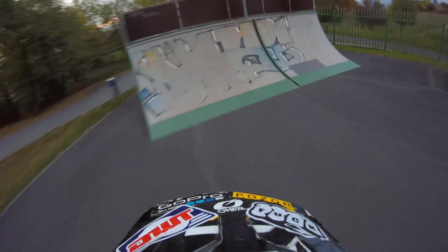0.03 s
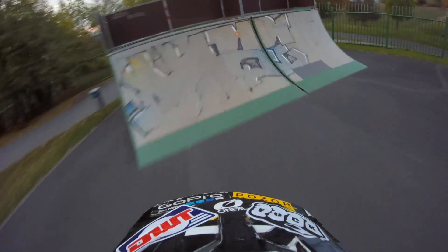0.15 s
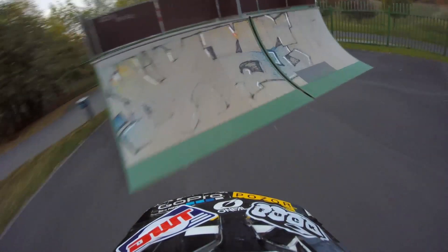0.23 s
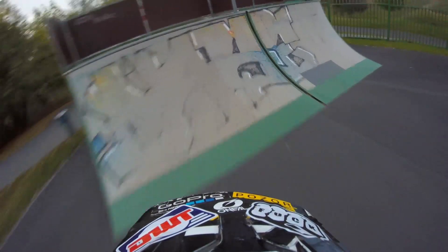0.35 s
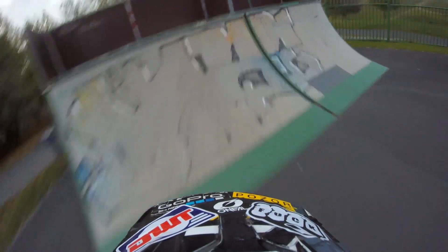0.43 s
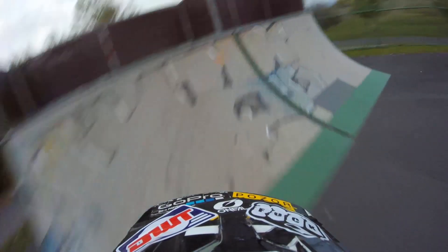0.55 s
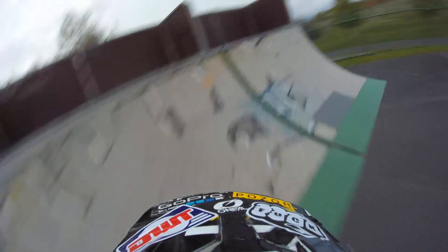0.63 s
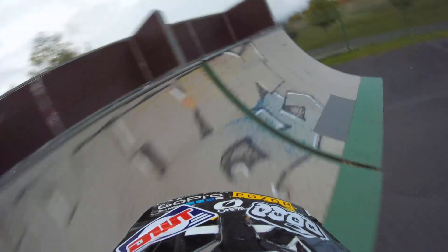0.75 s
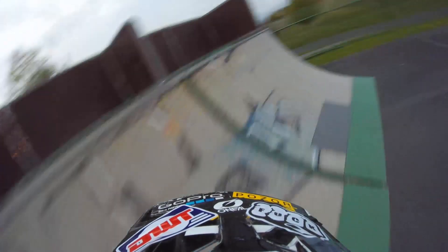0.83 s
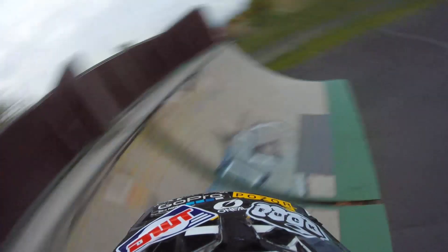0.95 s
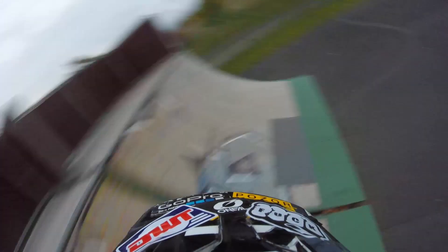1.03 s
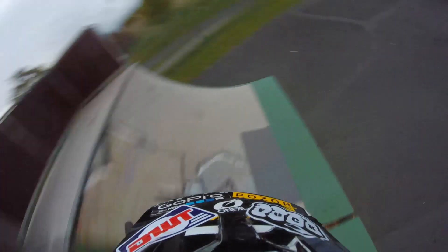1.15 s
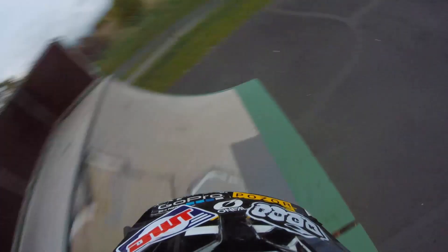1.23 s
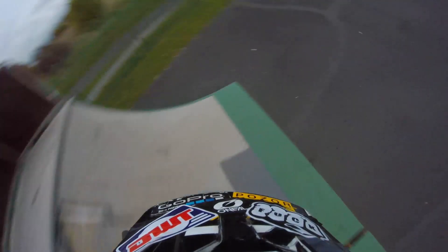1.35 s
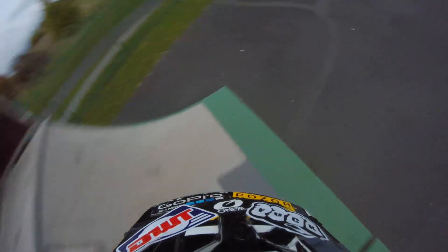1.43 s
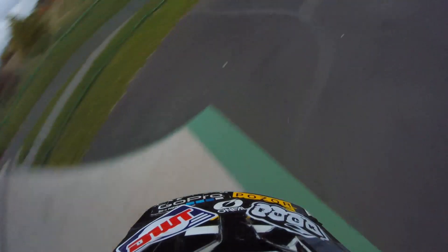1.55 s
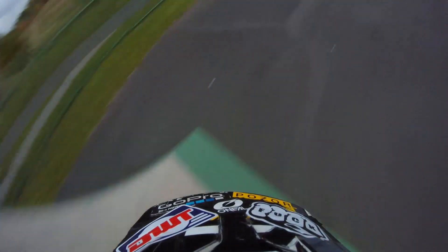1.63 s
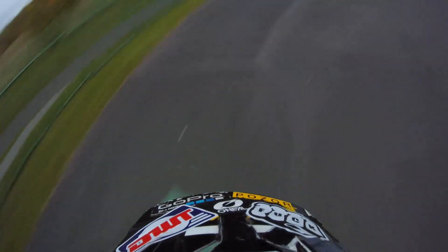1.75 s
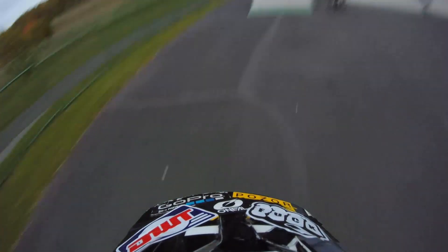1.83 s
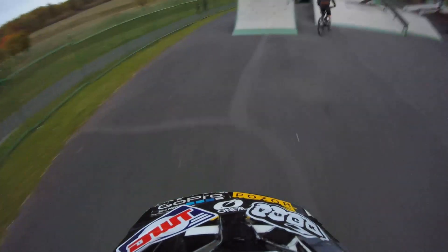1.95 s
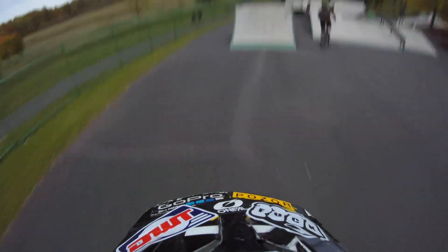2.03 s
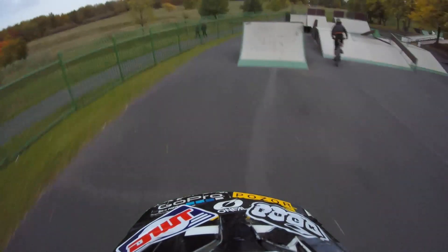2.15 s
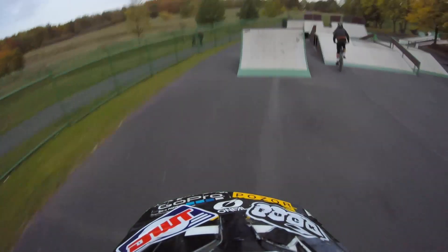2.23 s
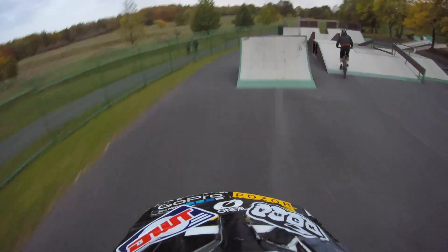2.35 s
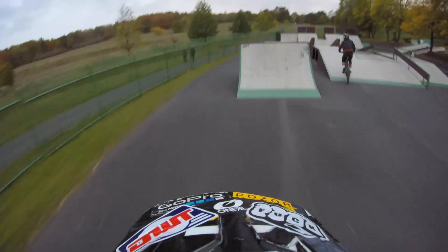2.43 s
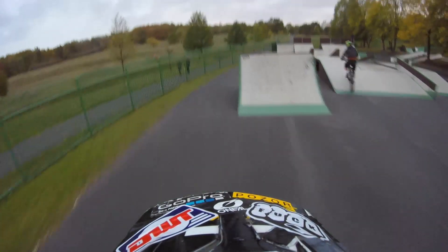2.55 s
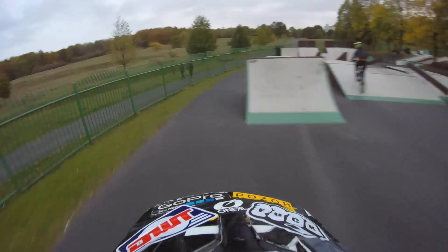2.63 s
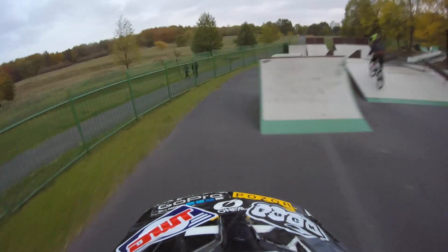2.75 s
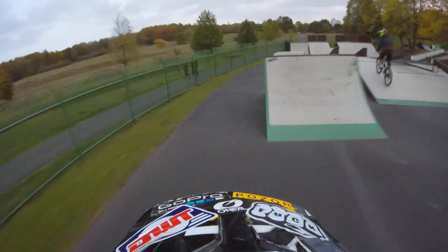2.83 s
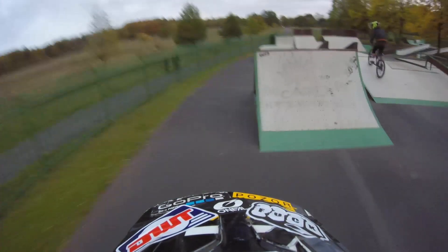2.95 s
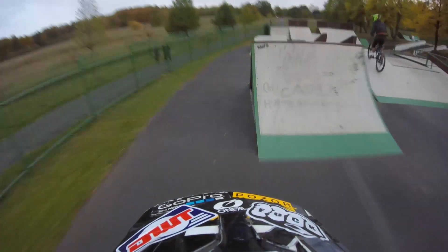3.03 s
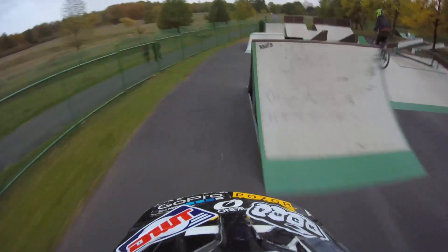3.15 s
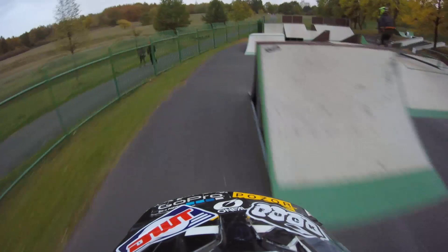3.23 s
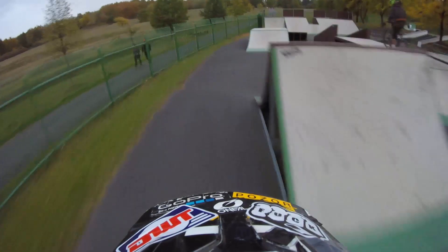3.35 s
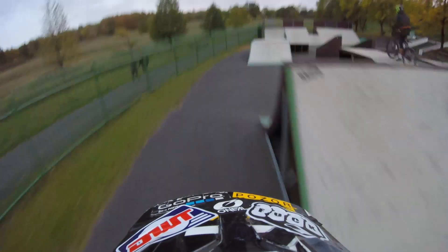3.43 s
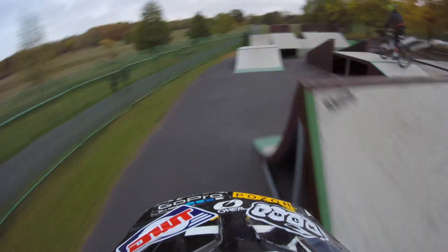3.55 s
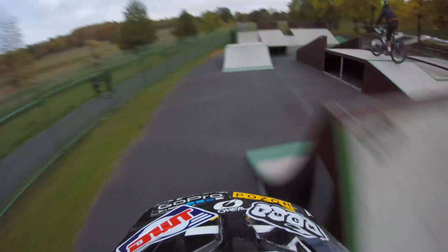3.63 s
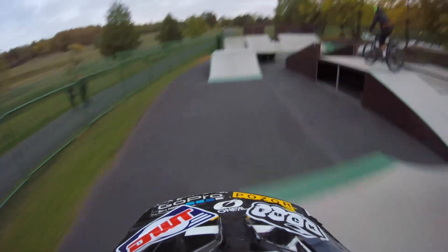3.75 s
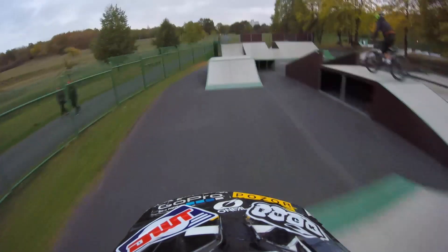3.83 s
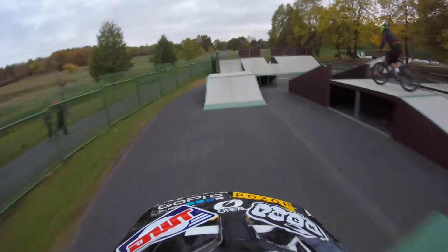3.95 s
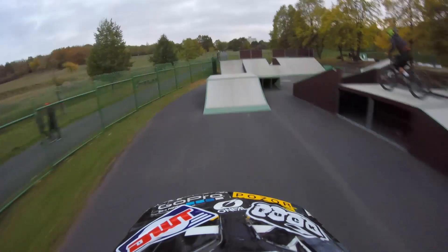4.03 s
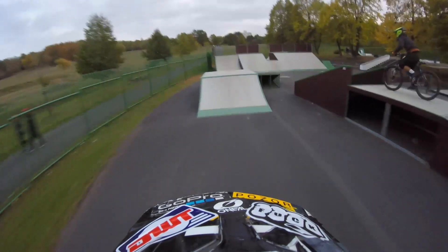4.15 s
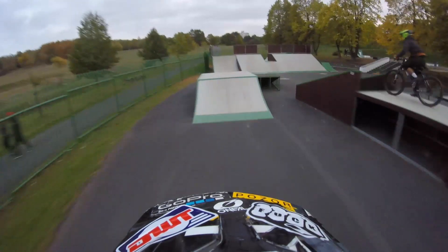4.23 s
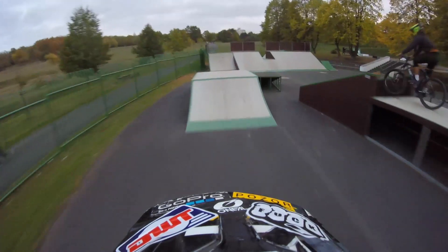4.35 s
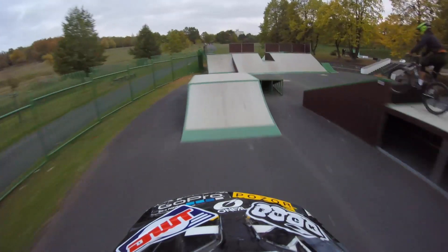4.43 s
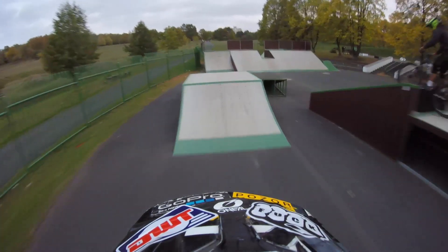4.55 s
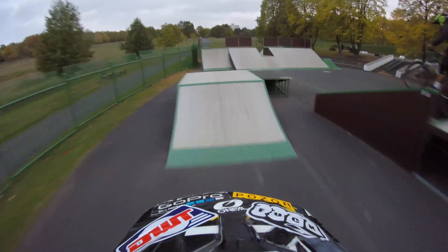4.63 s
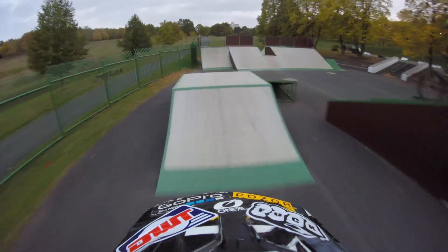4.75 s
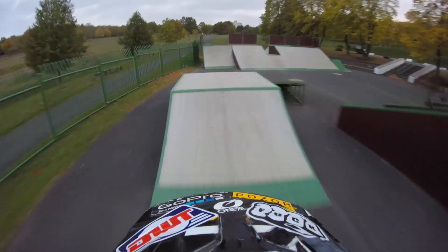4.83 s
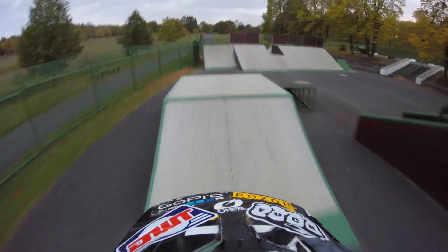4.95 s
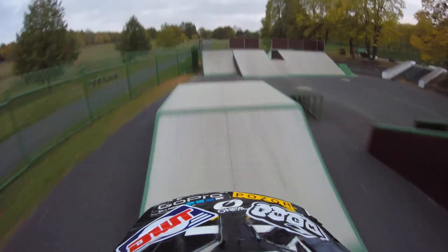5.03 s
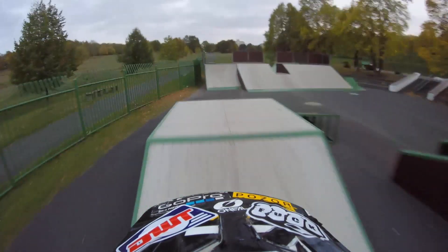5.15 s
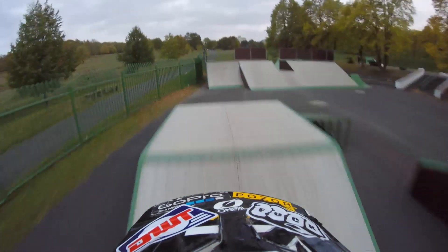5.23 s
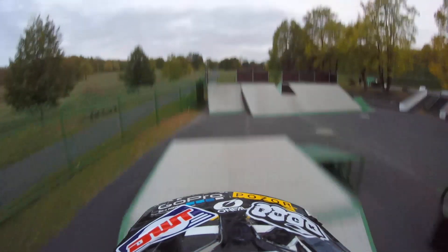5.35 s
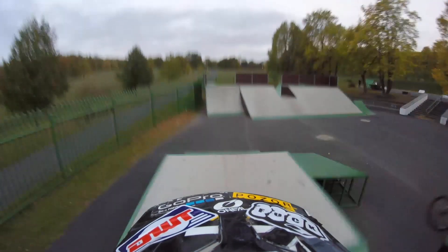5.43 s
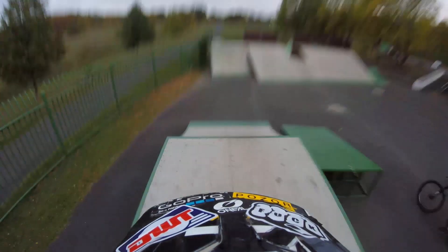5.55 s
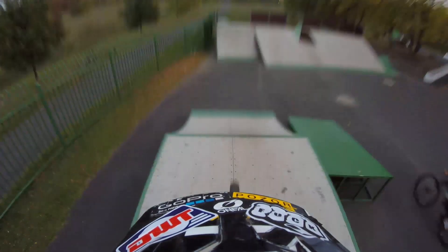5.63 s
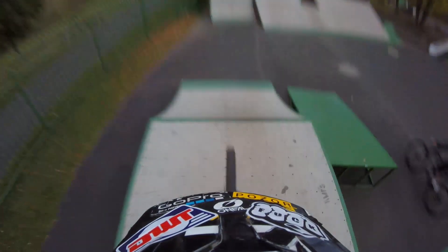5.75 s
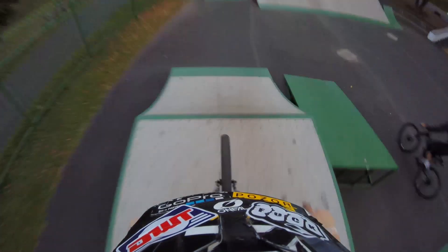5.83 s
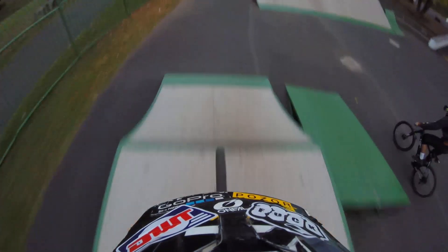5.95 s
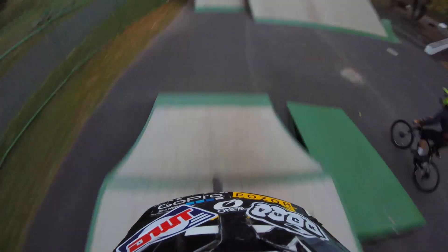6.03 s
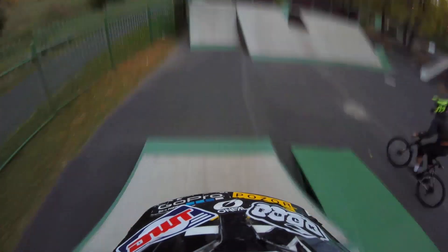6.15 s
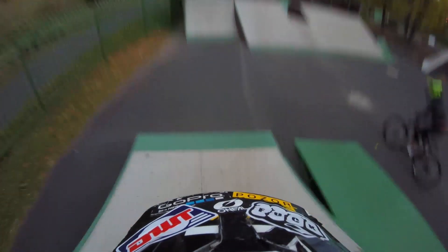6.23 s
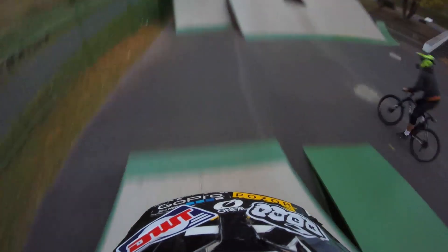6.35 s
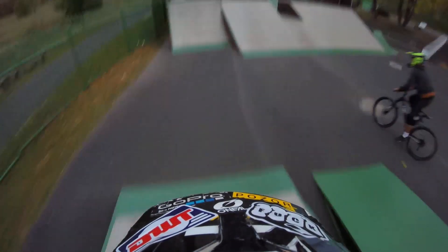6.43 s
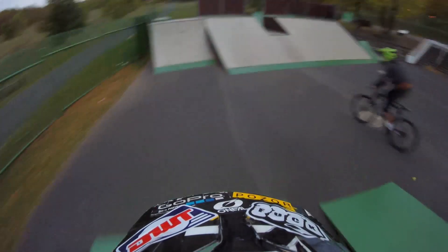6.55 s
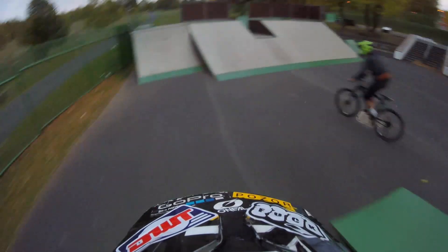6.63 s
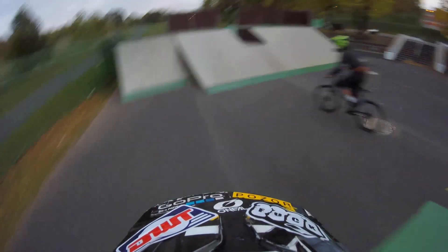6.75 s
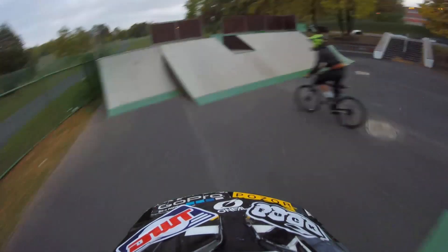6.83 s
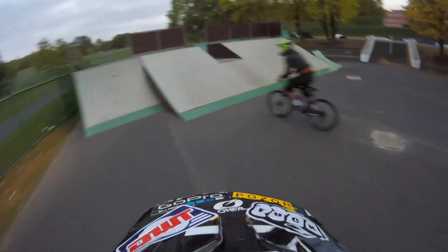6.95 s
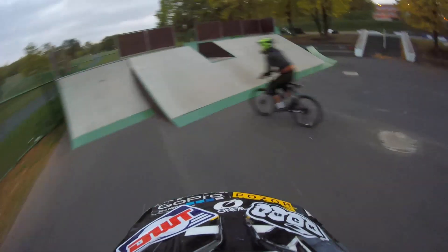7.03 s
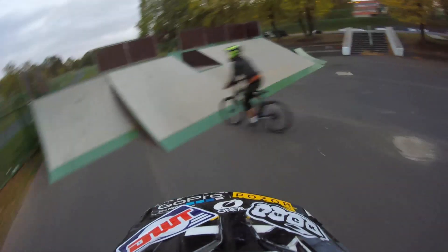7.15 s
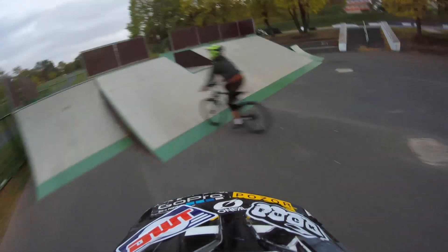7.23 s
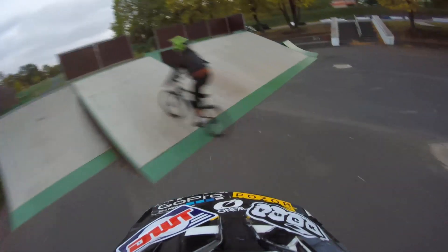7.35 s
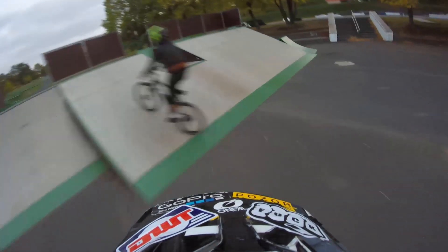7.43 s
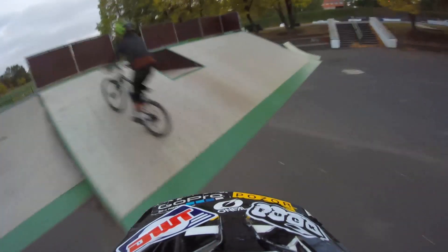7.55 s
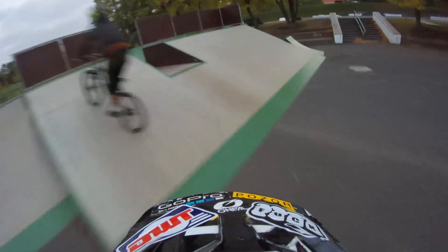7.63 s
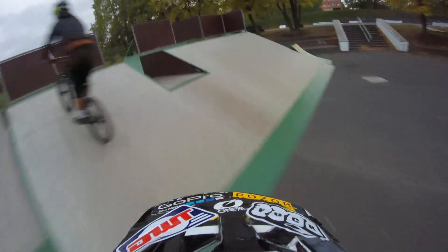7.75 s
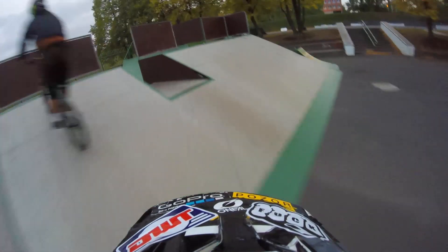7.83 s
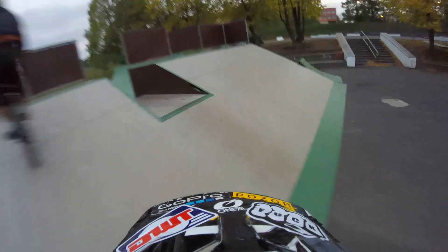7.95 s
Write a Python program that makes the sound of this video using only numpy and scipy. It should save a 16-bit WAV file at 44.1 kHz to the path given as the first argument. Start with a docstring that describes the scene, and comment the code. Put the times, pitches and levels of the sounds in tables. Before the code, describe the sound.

Outdoors in a skate park, a microphone sealed in a housing on a cyclist's helmet picks up a close, muffled ride. A soft, dull air rush runs throughout, with low fluttering and drumming underneath. At first the freewheel buzzes clearly over gritty tyre roll, fading by 0.6 s, when a knock and scraping tyres mark the first curved ramp. Small knocks follow around 1.2-1.9 s and 2.3-2.6 s. From about 2.8 to 4 s the hub buzz swells and dips over rolling tyres, then weakens. At 5.0-5.2 s a tight cluster of tyre slaps, chain and loose-part rattles hits a ramp with low thuds; another slap comes at 5.5 s. Wheel noise nearly vanishes until a hard crack and the heaviest bass thump at 6.1 s. A second deep thud lands at 6.7 s. Rapid clattering knocks at 7.3-7.5 s end in quiet rolling and faint buzz until 8 s.

```python
"""Low thumps and flutter, rolling tyres, a buzzing freewheel and sharp rattling knocks over a soft rush of air.
A camera in a closed housing on a cyclist's helmet crosses a skate park of asphalt and wooden ramps.
Buffeting and landings shake the housing: slow filtered noise, a narrow drumming band and damped swings.
Tyres, hub, chain and loose parts are random clicks sent through resonances; knocks are short noise bursts
through resonances or a plain band. The air rush is coloured noise that also rings a hollow of the helmet."""
import sys
import numpy as np
from scipy import signal
from scipy.fft import rfft, irfft
from scipy.io import wavfile
from scipy.ndimage import uniform_filter1d

SR = 44100
rng = np.random.default_rng(int(sys.argv[2]) if len(sys.argv) > 2 else 0)


def file_out(sig):
    """Save sig as 16-bit WAV at sys.argv[1]."""
    # one column per channel
    cols = np.atleast_2d(sig).T
    # limit, then scale
    lim = np.clip(cols, -1, 1)
    pcm = np.round(lim * 32767).astype(np.int16)
    wavfile.write(sys.argv[1], SR, pcm)


N = 352167

# resonances of the tyre: (frequency [Hz], width [Hz], level [dB])
TYRE_MODES = [(1458, 187, -5.5), (1860, 295, -7.5), (2245, 510, -12)]
# resonances of the chain: (frequency [Hz], width [Hz], level [dB])
CHAIN_MODES = [(3154, 335, 1.5), (3790, 450, -3), (4110, 200, -3.5)]
# resonances of the loose parts: (frequency [Hz], width [Hz], level [dB])
PARTS_MODES = [(4070, 450, 5), (4830, 63, -2), (5000, 440, -7.5), (6210, 380, 3.5), (7870, 660, -5.5),
               (10700, 3800, -13), (13400, 6000, -16.5)]


def undb(db):
    """Turn a level in dB into a gain."""
    return 10 ** (np.asarray(db) / 20)


def unit(x):
    """Scale a signal to an average (rms) strength of 1."""
    return x / np.sqrt(np.mean(x ** 2))


def columns(table):
    """Draw straight lines between the times of a table, giving each other column sample by sample."""
    times, *rest = np.transpose(table)
    return [np.interp(np.arange(N) / SR, times, column) for column in rest]


def ring(x, modes):
    """Resonances side by side, each boosting a narrow band; every second one is flipped in sign."""
    total = 0
    for k, (hz, width, db) in enumerate(modes):
        b, a = signal.iirpeak(hz, hz / width, fs=SR)
        total = total + (-1) ** k * undb(db) * signal.lfilter(b, a, x)
    return total


def band(x, lo_hz, hi_hz, order=2):
    """Keep the sound between two frequencies (Butterworth band-pass)."""
    return signal.sosfilt(signal.butter(order, [lo_hz, hi_hz], "band", fs=SR, output="sos"), x)


def walk(rate):
    """A random wander of rms 1: `rate` new values a second, smoothed twice."""
    hold = int(SR / rate)
    steps = np.repeat(rng.standard_normal(N // hold + 1), hold)
    smooth = uniform_filter1d(uniform_filter1d(steps, hold), hold)
    return unit(smooth[:N])


def grains(rate, scatter_db):
    """Random clicks of both signs, `rate` a second on average; a few are much louder than the rest."""
    hit = rng.random(N) < rate / SR
    return unit(hit * rng.standard_normal(N) * undb(scatter_db * rng.exponential(size=N)))


def swells(start, length, db, share):
    """Gain of sounds that rise, hold and fall; where they overlap, their powers add."""
    t, power = np.arange(N) / SR, np.zeros(N)
    for s, span, gain in zip(start, length, undb(db)):
        i, j = int(s * SR), min(int((s + span) * SR), N)
        to_nearest_end = np.minimum(t[i:j] - s, s + span - t[i:j])
        edge = np.clip(to_nearest_end / (share * span), 0, 1)
        power[i:j] += (gain * np.sin(np.pi / 2 * edge)) ** 2
    return np.sqrt(power)


def shaking():
    """Slow pressure eddies push the housing; its mount drums in a narrow band."""
    # gusts that buffet the housing: (start [s], length [s], level [dB])
    gusts = [(0, 0.73, -50.5), (0.536, 0.45, -36), (1.283, 0.13, -41.5), (1.56, 0.24, -46),
             (1.866, 0.7, -39.5), (2.556, 0.45, -45.5), (3.047, 0.41, -39.5), (3.748, 0.4, -41),
             (4.2, 0.15, -56), (4.853, 0.43, -46), (5.04, 0.47, -41), (5.715, 0.13, -40),
             (6.042, 0.15, -26), (6.188, 0.51, -39.5), (6.654, 0.25, -35.5), (7.297, 1, -41.5)]
    # spells of the mount drumming: (start [s], length [s], level [dB])
    spells = [(0.004, 0.46, -44), (0.504, 0.13, -43), (0.76, 0.49, -53), (1.1, 0.12, -41),
              (1.285, 0.49, -41), (1.933, 0.15, -43), (2.092, 0.14, -35), (2.285, 0.13, -40.5),
              (2.567, 0.3, -41), (2.89, 0.28, -43.5), (3.35, 0.31, -47), (3.703, 0.5, -53.5),
              (4.193, 0.24, -47.5), (4.56, 0.35, -57), (5.05, 0.28, -52.5), (5.405, 0.4, -48.5),
              (6.253, 0.31, -58), (6.677, 0.1, -34.5), (7.017, 0.19, -39.5), (7.226, 0.27, -45),
              (7.664, 0.25, -44.5)]
    # resonances of the mount: (frequency [Hz], width [Hz], level [dB])
    mount = [(87.1, 10.5, 10.5), (73.3, 4.7, -7)]
    buffet_db, drum_db = -48, -55  # steady levels between gusts and spells
    swell_share = 0.23  # part of a gust or spell spent rising, and again falling

    buffet = band(rng.standard_normal(N), 6.1, 24.4, order=1) * undb(1.0 * walk(3.18))
    drum = ring(rng.standard_normal(N), mount) * undb(0.5 * walk(5.4))
    buffet_gain = np.hypot(undb(buffet_db), swells(*np.transpose(gusts), swell_share))
    drum_gain = np.hypot(undb(drum_db), swells(*np.transpose(spells), swell_share))
    return buffet_gain * unit(buffet) + drum_gain * unit(drum)


def jolts():
    """Each landing pushes the housing for a moment; it swings one way, back and settles."""
    # jolts of the housing: (time [s], peak level [dB], swing [Hz], build-up [s], direction [+1 or -1])
    jolt_list = [(0.759, -27, 18, 0.026, 1), (2.055, -41, 10, 0.0072, -1), (2.235, -32, 24, 0.01, -1),
                 (5.12, -27.5, 22, 0.0056, -1), (5.262, -27, 7.8, 0.0087, 1), (5.499, -30.5, 22, 0.0075, 1),
                 (6.044, -25.5, 47, 0.0068, 1), (6.091, -10, 38.5, 0.0084, 1),
                 (6.124, -13.5, 30, 0.0043, 1), (6.179, -12, 27, 0.011, -1), (6.672, -23.5, 19, 0.0049, 1),
                 (6.7, -13, 36.5, 0.012, 1), (6.732, -11.5, 25, 0.0073, 1), (7.919, -27.5, 17, 0.019, -1)]
    out = np.zeros(N + SR)
    t = np.arange(SR // 2) / SR
    for s, db, hz, build, way in jolt_list:
        swing = np.sin(2 * np.pi * hz * t) * t * np.exp(-t / max(build, .002))
        out[int(s * SR):][:len(t)] += np.sign(way) * undb(db) * swing / np.abs(swing).max()
    return out[:N]


def knocks():
    """A snap, a burst that dies away and a weak scuff set off tyre, rim, chain, loose parts and plywood."""
    # knocks on ramp edges, with how hard each thing is struck before its own boost below:
    # (time [s], tyre slap [dB], rim crack [dB], chain [dB], loose parts [dB], plywood [dB],
    # time for the burst to fall by 60 dB [s])
    knock_list = [(0.5933, -50, -39, -52, -69, -50.5, 0.035), (1.1797, -65, -72, -78, -80, -46.5, 0.17),
                  (1.3686, -45, -73, -72, -76, -53, 0.069), (1.8337, -45, -50, -70, -74, -70, 0.074),
                  (1.8925, -47, -50, -68, -68, -64, 0.24), (2.2636, -58, -43, -62, -73, -69, 0.08),
                  (2.6474, -60, -47, -53, -53, -55, 0.058), (5.028, -56, -59, -63, -60, -67, 0.08),
                  (5.0521, -54, -56, -55, -53, -55, 0.08), (5.089, -42, -52, -51, -53, -53, 0.07),
                  (5.1217, -38.5, -56, -45, -47.5, -48.5, 0.11), (5.1454, -37, -51.5, -47, -45, -53, 0.089),
                  (5.5322, -35.5, -41, -55, -62, -62, 0.027), (5.789, -50, -53, -68, -71, -66, 0.09),
                  (6.0135, -44, -50, -55, -63, -49, 0.19), (6.0676, -34, -26, -42, -47, -42.5, 0.057),
                  (6.082, -48, -38, -54, -63, -52, 0.075), (6.348, -51, -44, -53, -66, -68, 0.13),
                  (6.7136, -31, -66, -72, -57, -46, 0.041), (7.293, -46, -53, -41, -43, -53, 0.038),
                  (7.3858, -36, -46, -52.5, -60, -47.5, 0.097), (7.4274, -64, -61, -49, -49, -67, 0.07),
                  (7.438, -40, -55, -50, -49, -51, 0.088), (7.4534, -41, -59, -52, -40.5, -56, 0.045),
                  (7.47, -50, -60, -47, -66, -60, 0.052)]
    # rise time of the burst in tyre, rim, chain, loose parts, plywood: (one value each [s])
    rise_s = [0.00033, 0.0005, 0.0015, 0.0016, 0.0011]
    # first snap over the burst, same five things: (one value each [dB])
    snap_db = [13.3, 12.3, 17, 3, 10.8]
    # resonance of the rim: (frequency [Hz], width [Hz], level [dB])
    rim_modes = [(2430, 280, -0.5)]

    tracks = np.zeros((5, N + SR))
    t = np.arange(SR // 3) / SR
    rise = 1 - np.exp(-t / np.array(rise_s)[:, None])
    snap = np.outer(undb(snap_db), np.exp(-t / 0.00012))
    scuff = 0.18 * np.exp(-t / 0.058)
    for s, *blow_db, t60 in knock_list:
        decay = np.exp(-np.log(1000) * t / max(t60, .01))
        burst = rng.standard_normal(len(t)) * (decay + scuff)
        tracks[:, int(s * SR):][:, :len(t)] += undb(blow_db)[:, None] * (burst * rise + snap)
    tyre, rim, chain, parts, plywood = tracks[:, :N]

    wheel = undb(11.0) * ring(tyre, TYRE_MODES)
    wheel += undb(4.5) * ring(rim, rim_modes)
    wheel += undb(8.5) * ring(chain, CHAIN_MODES)
    loose = undb(7.5) * band(ring(parts, PARTS_MODES), 2900, 17000)
    boards = undb(18.5) * band(plywood, 94, 286)
    return band(wheel, 1160, 4560, order=3) + loose + boards


def bike():
    """Tread on grit, pawls chattering in the hub, chain and guards rattling; little bass passes the shell."""
    # the ride: (time [s], tyre roll level [dB], freewheel buzz level [dB])
    ride = [(0, -52.5, -46.5), (0.35, -56.5, -51.5), (0.66, -59.5, -59.5), (0.8, -58, -56.5),
            (0.96, -59.5, -60.5), (1.12, -63.5, -75), (1.55, -62.5, -74), (1.8, -63, -68),
            (2.14, -53.5, -78), (2.21, -56, -57), (2.86, -54, -46.5), (3.1, -53, -53), (3.25, -52.5, -50.5),
            (3.68, -58, -58), (3.77, -53.5, -51.5), (3.9, -55.5, -49), (4.1, -58.5, -56),
            (4.65, -59, -57.5), (5.0, -63, -60.5), (5.5, -59, -63), (5.6, -69, -76), (5.98, -78, -76),
            (6.55, -65, -68), (6.64, -60, -63), (7.2, -61, -59), (7.55, -61, -64), (7.98, -61, -60)]
    # resonances of the hub: (frequency [Hz], width [Hz], level [dB])
    hub = [(2206, 385, -9), (2586, 123, 1), (3145, 82, -12.5), (6340, 300, -25.5), (9200, 100, -34),
           (10420, 380, -35.5), (13000, 200, -39), (13800, 720, -37)]
    # scrapes of the wheels over ramp edges and decks:
    # (start [s], length [s], tyre level [dB], chain level [dB], loose parts level [dB])
    scrapes = [(0.64, 0.07, -59, -75, -81), (0.724, 0.17, -57, -68, -73), (0.9, 0.09, -63, -70, -74),
               (1.17, 0.1, -60, -85, -75), (1.328, 0.071, -64, -84, -80), (5.05, 0.072, -55, -61.5, -64),
               (5.108, 0.092, -49, -57.5, -53.5), (5.163, 0.14, -54, -62, -67),
               (5.314, 0.12, -59, -61, -72), (5.47, 0.061, -51.5, -66, -70), (5.594, 0.2, -66, -77, -82),
               (6.07, 0.16, -57.5, -68, -73), (6.223, 0.1, -57, -70, -75), (6.342, 0.087, -60, -67, -68),
               (7.233, 0.068, -58, -65, -69), (7.286, 0.1, -53, -60.5, -64),
               (7.384, 0.049, -52.5, -60, -69), (7.417, 0.082, -51, -58, -70), (7.484, 0.07, -57, -63, -68),
               (7.824, 0.15, -72, -68, -73)]
    scrape_share = 0.24  # part of a scrape spent rising, and again falling
    chain_below_buzz_db, parts_below_buzz_db = -8, -27.5
    chain_idle_db, parts_idle_db = -77.5, -77.5  # rustle and rattle that never stop

    roll = band(ring(grains(3000, 0.63) * undb(0.56 * walk(17)), TYRE_MODES), 865, 3700, order=3)
    buzz = band(ring(grains(1500, 0.52) * undb(1.3 * walk(11)), hub), 1500, 17000)
    rustle = band(ring(grains(2500, 0.56) * undb(0.69 * walk(16)), CHAIN_MODES), 2620, 3840, order=3)
    rattle = band(ring(grains(2500, 2.9) * undb(3.6 * walk(25)), PARTS_MODES), 3300, 17000)

    rolling, coasting = undb(columns(ride))
    start, length, *scrape_db = np.transpose(scrapes)
    scuff, shake, clatter = (swells(start, length, db, scrape_share) for db in scrape_db)
    # gains add as powers: idle, share of the buzz, scrapes
    tyre_gain = np.hypot(rolling, scuff)
    chain_gain = np.sqrt(undb(chain_idle_db) ** 2 + (undb(chain_below_buzz_db) * coasting) ** 2 + shake ** 2)
    parts_gain = np.sqrt(undb(parts_idle_db) ** 2 + (undb(parts_below_buzz_db) * coasting) ** 2 + clatter ** 2)
    wheels = tyre_gain * unit(roll) + coasting * unit(buzz)
    return wheels + chain_gain * unit(rustle) + parts_gain * unit(rattle)


def rush():
    """Smooth air noise leaks through the shell, and a hollow of the helmet rings with it."""
    # tone colour of the rushing air: (frequency [Hz], level per Hz [dB])
    rush_colour = [(65, -56), (110, -12), (144, -6.5), (173, -8), (947, -19), (1210, -21), (1530, -17.5),
                   (1690, -18.5), (2560, -25), (4380, -31.5), (6360, -34.5), (10700, -40), (14600, -48.5),
                   (15500, -52)]
    # hollow that the air noise rings: (frequency [Hz], width [Hz], level [dB])
    hollow = [(316, 57, -8.5)]
    # air rushing past, before a slight random wander: (time [s], level [dB])
    air_level = [(0, -53.5), (0.6, -56), (1.6, -56.5), (2.5, -55), (3.3, -54.5), (4.4, -57), (5.3, -56),
                 (5.9, -57.5), (7.4, -56), (7.99, -57)]

    hz = np.maximum(np.fft.rfftfreq(N, 1 / SR), 1)
    colour_hz, colour_db = np.transpose(rush_colour)
    colour = np.interp(np.log(hz), np.log(colour_hz), colour_db, left=-90)
    air = irfft(rfft(rng.standard_normal(N)) * undb(colour), N)
    air += ring(air, hollow)
    return unit(air) * undb(columns(air_level)[0] + 0.5 * walk(6))


def scene():
    """Shaking and jolts are held in the bass by a steep low-pass; knocks, the bike and the air rush sound over
    them."""
    bass_edge_hz = 106.8
    low_pass = signal.butter(8, bass_edge_hz, fs=SR, output="sos")
    body = signal.sosfilt(low_pass, shaking() + jolts())
    return (body + knocks() + bike() + rush())[None]


def record(dry):
    """The camera cuts the top of the treble with a steep low-pass filter."""
    top_hz = 15250
    return signal.sosfilt(signal.ellip(8, .2, 70, top_hz, fs=SR, output="sos"), dry)


dry = scene()
out = record(dry)
file_out(out)
```